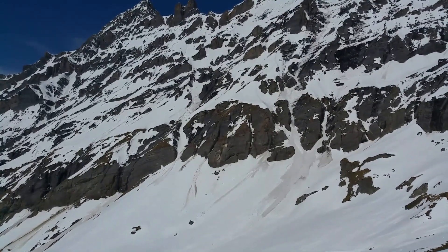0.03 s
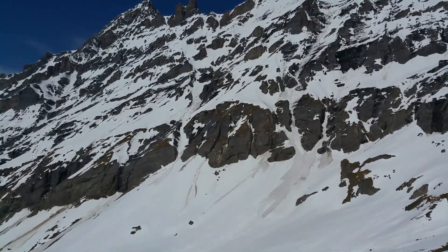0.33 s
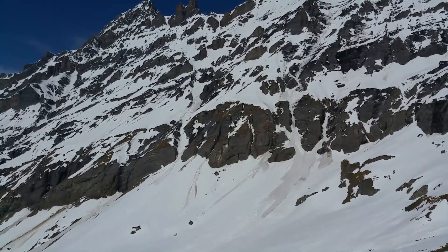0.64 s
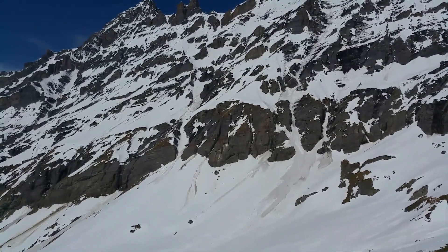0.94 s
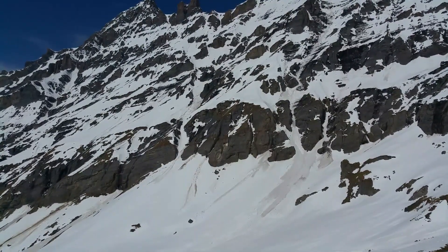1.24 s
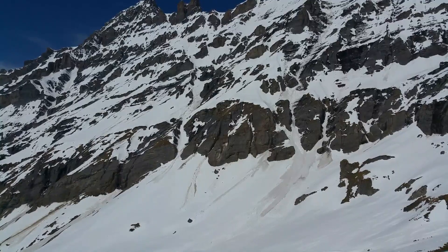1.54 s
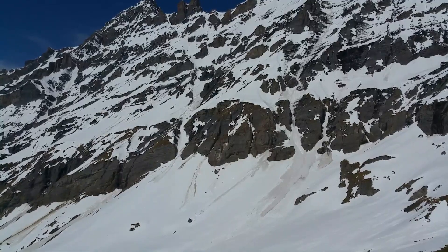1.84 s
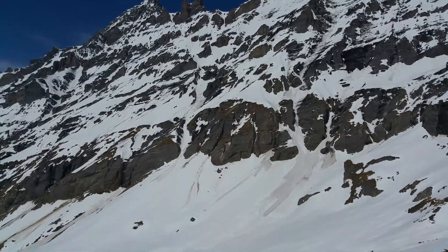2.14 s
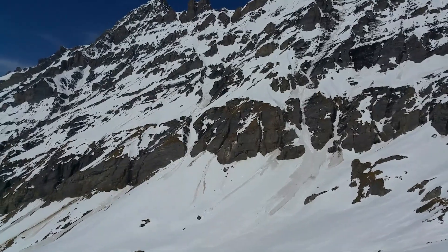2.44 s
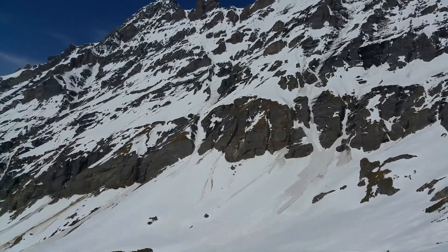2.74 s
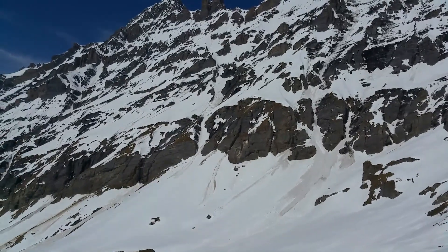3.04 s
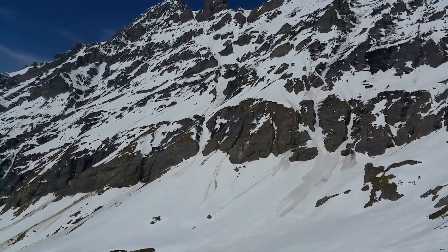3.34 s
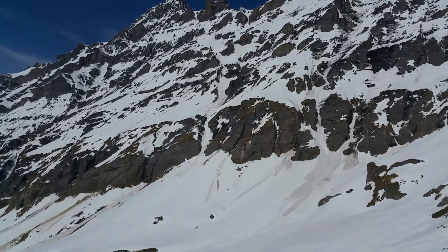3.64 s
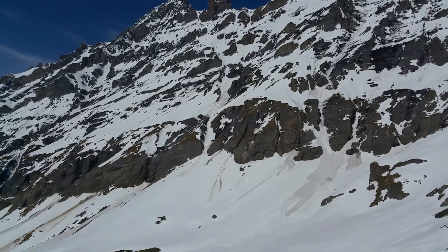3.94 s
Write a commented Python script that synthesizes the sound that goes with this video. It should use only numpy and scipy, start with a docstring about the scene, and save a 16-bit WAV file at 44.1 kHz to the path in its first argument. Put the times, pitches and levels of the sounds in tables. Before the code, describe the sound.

Steady low mountain wind rumbles, with a brief run of creaking ticks close by midway.

```python
"""A high, snowy mountainside. Wind or sliding snow makes a steady far rumble and rush, with soft thuds
and small knocks as of tumbling lumps. Early on, puffs of air buffet the left microphone port. Midway
something right at the microphone, probably its mount being turned, creaks in a run of dry stick-slip
ticks that come ever faster and then stop. The recorder adds a faint hiss and a thin on-and-off buzz."""
import sys
import numpy as np
from scipy.fft import rfft, irfft, next_fast_len
from scipy.io import wavfile
from scipy.ndimage import uniform_filter1d, map_coordinates

SR = 44100
rng = np.random.default_rng(int(sys.argv[2]) if len(sys.argv) > 2 else 0)


def waveform_to_disk(signal):
    """Save audio, clipped to [-1, 1], as 16-bit WAV at the path in sys.argv[1]."""
    frames = np.transpose(np.atleast_2d(signal))
    scaled = np.clip(frames, -1, 1) * 32767
    samples = np.round(scaled).astype(np.int16)
    wavfile.write(sys.argv[1], SR, samples)


N = 176400

# Fader ride of the midrange rush. Each row: time in seconds, level in dB.
RUSH_RIDE = [(0, -50.5), (.15, -50), (.4, -50), (.75, -50.5), (1.15, -52), (1.45, -51), (1.7, -52),
             (2.7, -51), (3.0, -53), (3.3, -53), (3.45, -50.5), (3.7, -52.5), (4, -54)]
# Slips of the creak. Each row: time in seconds, relative snap, knock and crack levels in dB,
# snap pitch in Hz.
CREAK_SLIPS = [(1.6827, -43, -43, -56, 2190), (1.714, -51, -44, -61, 2040), (1.7456, -56, -60, -62, 2080),
               (1.773, -57, -54, -58.5, 2100), (1.789, -33, -33, -52.5, 1990), (1.796, -45, -43, -63, 2260),
               (1.8344, -52, -37, -60, 2000), (1.8717, -49, -35, -63, 2000), (1.917, -54, -44, -61, 1960),
               (1.9203, -48, -56, -62, 2100), (1.9476, -47, -39.5, -63, 2160),
               (1.9733, -48, -54, -64, 2190), (2.0026, -45, -38, -69, 2130), (2.02, -53, -41, -63, 2220),
               (2.0388, -48, -49, -65, 2160), (2.0562, -46, -38, -59, 2170), (2.075, -51, -52, -60, 2290),
               (2.0885, -50, -41, -71, 2140), (2.1045, -43, -53, -68, 2110), (2.1174, -39, -38, -64, 2080),
               (2.129, -45, -43, -58, 2150), (2.1412, -48, -38, -63, 2150),
               (2.1493, -32.5, -32.5, -53, 2030), (2.1592, -44, -58, -66, 2020),
               (2.1728, -51, -38, -66, 2100), (2.184, -53, -32, -63, 2200),
               (2.197, -29.5, -26.5, -48, 2240), (2.207, -53, -37, -62, 2300),
               (2.218, -49, -34.5, -70, 2000), (2.2313, -49, -38, -64, 2200),
               (2.244, -25, -33.5, -54, 2180), (2.257, -45, -45, -67, 1980), (2.2663, -51, -38, -64, 2100),
               (2.278, -47, -36, -57, 1990), (2.2972, -29.5, -28, -45, 2260),
               (2.314, -37.5, -38.5, -50, 2170), (2.332, -45, -39, -66, 2250),
               (2.3484, -48, -48, -62, 2210), (2.353, -37, -57, -64, 1900),
               (2.3613, -29.5, -30.5, -50.5, 2090), (2.3876, -50, -37, -61, 2150),
               (2.3982, -36, -36, -58, 2080), (2.403, -49, -37, -58, 2080), (2.4219, -37, -53, -59, 2140),
               (2.4251, -34.5, -29, -54, 2200), (2.4294, -43, -44, -60, 2200),
               (2.4375, -34, -58, -59, 2260), (2.448, -48, -44, -66, 2100), (2.4747, -36, -37, -58, 2090),
               (2.4864, -35.5, -28.5, -50, 2350), (2.507, -31, -32.5, -51.5, 2190),
               (2.5333, -33.5, -35.5, -59, 1980), (2.5479, -42, -30, -51, 2260),
               (2.5522, -36.5, -39, -55, 1890), (2.5551, -35, -34, -56, 2250),
               (2.5721, -37, -43, -57, 2100), (2.576, -39, -38, -55, 2190), (2.5939, -31.5, -33, -50, 2120),
               (2.6092, -41, -36, -57, 2200), (2.6124, -38.5, -27, -49, 2300), (2.628, -43, -45, -59, 2010),
               (2.6352, -32.5, -47, -51, 1940), (2.649, -43, -51, -59, 2040),
               (2.6575, -35, -53, -51.5, 2110), (2.6742, -40, -38, -59, 2070),
               (2.6828, -28, -31.5, -46, 2030), (2.699, -48, -61, -65, 2000),
               (2.7081, -36, -36.5, -54, 2100), (2.714, -43, -49, -66, 1980), (2.7313, -50, -52, -63, 2070),
               (2.7377, -33, -50, -54, 2110), (2.7415, -43, -33, -73, 1980), (2.7484, -55, -51, -65, 2080),
               (2.7687, -27, -42, -51, 1830), (2.7769, -39, -33, -52, 2010)]


def amp(db):
    """Decibels to gain."""
    return 10 ** (np.asarray(db) / 20)


def unit(x):
    """Scale to rms 1."""
    return x / np.sqrt(np.mean(x ** 2) + 1e-20)


def along(points, hz):
    """Read (Hz, value) points on a log frequency axis."""
    f, v = np.transpose(points)
    return np.interp(np.log(hz + 1), np.log(f + 1), v)


def curve(rows):
    """Join (seconds, value) points, one value per sample."""
    return np.interp(np.arange(N) / SR, *np.transpose(rows))


def wobble(rate):
    """A smooth random curve with `rate` knots a second."""
    knots = rng.standard_normal(int(N * rate / SR) + 4)
    return map_coordinates(knots, [np.arange(N) * rate / SR])


def filtered(x, response):
    """Filter x by a complex response of frequency."""
    size = next_fast_len(N + SR // 4)
    return irfft(rfft(x, size) * response(np.fft.rfftfreq(size, 1 / SR)), size)[..., :N]


def noise(spectrum):
    """Mono coloured noise of rms 1."""
    return unit(filtered(rng.standard_normal(N), lambda hz: amp(along(spectrum, hz))))


def sides(balance_db, lag):
    """Left and right responses for a level difference and a phase lag of the left port."""
    return amp(np.outer([.5, -.5], balance_db)) * np.exp(1j * np.outer([-.5, .5], lag))


def wide_noise(spectrum, left_lag_s=.00011):
    """Stereo noise of rms 1, narrow in the bass and wide in the treble, reaching the left port later."""
    # Stereo image. Each row: frequency in Hz, then left-right coherence or left over right in dB.
    coherence = [(30, .66), (65, .9), (130, .985), (290, .985), (640, .95), (1400, .6), (3000, .15),
                 (6000, 0)]
    balance = [(50, 2.5), (200, 0), (700, 1.5), (1300, 2), (2400, -6), (4400, 0)]

    def mid_side(hz):
        width = np.arccos(np.clip(along(coherence, hz), -1, .985)) / 2
        return amp(along(spectrum, hz)) * [np.cos(width), np.sin(width)]

    mid, side = filtered(rng.standard_normal((2, N)), mid_side)
    pan = lambda hz: sides(along(balance, hz), 2 * np.pi * hz * left_lag_s)
    return unit(filtered(np.array([mid + side, mid - side]), pan))


def close_up(x):
    """Place a sound right at the microphone: level and phase differ between the two ports."""
    # Each row: frequency in Hz, then left over right in dB or the left port's lag in radians.
    balance = [(500, 0.5), (1200, 1), (2200, -2.5), (4000, -8), (8000, -3)]
    lag = [(200, 0.15), (900, 0.13), (1600, 1.2), (2500, 0.55), (3100, 2), (3800, 0.53), (5000, 1.3),
           (12000, 0.76)]
    return filtered(x, lambda hz: sides(along(balance, hz), along(lag, hz)))


def swell(t, rise_s, fall_s):
    """A rounded attack to 1 at t = 0, then an exponential decay."""
    return np.exp(-(np.minimum(t, 0) / rise_s) ** 2 - np.maximum(t, 0) / fall_s)


def bursts(rows, spectrum, rise_s, fall_s):
    """One short burst of coloured noise per (seconds, dB) row."""
    source, out = noise(spectrum), np.zeros(N)
    for s, db in rows:
        i = np.arange(max(int((s - 3 * rise_s) * SR), 0), min(int((s + 8 * fall_s) * SR), N))
        shape = swell(i / SR - s, rise_s, fall_s)
        burst = source[i] * shape
        out[i] += amp(db) * burst * np.linalg.norm(shape) / (np.linalg.norm(burst) + 1e-12)
    return out


def mountain(rumble_rough_db=0.82, rush_rough_db=1.03, shared_db=0.9, bass_db=-49.5):
    """Far wind or sliding snow: a rumble and an airy rush flutter partly together over a steady bass."""
    # Fader rides of the rumble and the rush's airy top. Each row: time in seconds, level in dB.
    rumble_ride = [(0, -42), (.3, -43), (.75, -42.5), (1.0, -44), (1.42, -40.5), (1.6, -44), (2.3, -45.5),
                   (3.1, -47.5), (3.42, -44), (3.65, -45), (3.94, -50), (4, -46)]
    air_ride = [(0, -65.5), (.14, -63.5), (.45, -66), (.8, -67.5), (1.2, -68.5), (2.8, -64), (3.2, -72.5),
                (3.52, -69), (4, -77.5)]
    # Tone of each layer, low to high. Each row: frequency in Hz, relative level in dB.
    bass_eq = [(15, -8), (30, -19), (60, -5), (95, -0.5), (150, -1), (250, -7), (600, -47), (2000, -93)]
    rumble_eq = [(15, -40), (30, -33), (60, -22), (100, -9.5), (160, 0.5), (245, 1.5), (310, -2),
                 (390, -10.5), (600, -23.5), (1500, -53.5)]
    rush_eq = [(150, -52), (310, -8.5), (430, 1), (680, -4.5), (950, -7), (1350, -11), (1680, -24),
               (2200, -26.5), (3000, -44), (5500, -62), (9000, -83)]
    air_eq = [(800, -10.5), (1500, 3.5), (2100, -0.5), (3000, -14.5), (4000, -16), (5200, -19.5),
              (6000, -35), (9000, -50)]
    shared = shared_db * wobble(22.26)
    rumble = amp(curve(rumble_ride) + shared + rumble_rough_db * wobble(40)) * wide_noise(rumble_eq)
    flutter = amp(shared + rush_rough_db * wobble(90))
    rush = amp(curve(RUSH_RIDE)) * wide_noise(rush_eq) + amp(curve(air_ride)) * wide_noise(air_eq)
    return rumble + flutter * rush + amp(bass_db) * wide_noise(bass_eq)


def hiss(level_db=-72):
    """The recorder's own steady noise floor."""
    # Each row: frequency in Hz, relative level in dB.
    hiss_eq = [(500, -26), (2500, 10.5), (4500, 3.5), (6000, -4), (8500, -2), (9900, 2), (12000, 2),
               (15500, 3)]
    return amp(level_db) * wide_noise(hiss_eq)


def thuds():
    """Soft, low thuds stand out of the rumble."""
    # Each row: time in seconds, level in dB.
    hits = [(.055, -36), (.09, -35.5), (.912, -34), (1.11, -33), (1.153, -35), (1.343, -34), (1.904, -34.5),
            (2.037, -35.5), (3.41, -34.5), (3.545, -37.5), (3.744, -36), (3.972, -35), (3.991, -43)]
    # Each row: frequency in Hz, relative level in dB.
    thud_eq = [(40, -25), (110, -6.5), (180, 3), (270, -5), (400, -16), (1200, -31), (2500, -76),
               (6000, -90)]
    return bursts(hits, thud_eq, rise_s=0.0022, fall_s=0.011)


def tumble(count=120, over_rush_db=-9):
    """Far knocks as of tumbling lumps: a few clear ones, and many small random ones that ride the rush."""
    # The clear knocks. Each row: time in seconds, level in dB.
    lumps = [(.088, -40), (.126, -32), (.66, -41), (.706, -35), (.911, -35), (.962, -33), (1.215, -42),
             (1.477, -36.5), (1.549, -52), (1.905, -34), (2.831, -37.5), (3.225, -40), (3.853, -38.5),
             (3.899, -41.5), (3.971, -47)]
    # Each row: frequency in Hz, relative level in dB.
    lump_eq = [(100, -8), (250, 4), (650, -5), (1000, -12), (1400, -15), (1750, -39), (3000, -45.5),
               (6000, -65)]
    when, size = rng.random((count, 2)).T
    times = when * N / SR
    size_db = -6 * np.log(0.16 + size)  # mostly small, now and then larger
    levels = np.interp(times, *np.transpose(RUSH_RIDE)) + over_rush_db + size_db
    return bursts([*lumps, *zip(times, levels)], lump_eq, rise_s=0.00043, fall_s=0.0017)


def buzz(pulse_hz=216.7):
    """A thin buzz of tiny, probably electrical, pulses comes and goes in the hiss."""
    # Each row: start in seconds, end in seconds, level in dB.
    bouts = [(0.187, .215, -80), (.347, .371, -77.5), (.385, .413, -79), (.509, 0.53, -76.5),
             (.552, 0.572, -78), (1.237, 1.283, -78), (1.286, 1.311, -78), (1.319, 1.34, -79),
             (1.5, 1.521, -81)]
    # Each row: frequency in Hz, relative level in dB.
    buzz_eq = [(4000, -32), (6200, -13), (7000, -16), (7900, -10), (8800, -15), (9600, 0), (10100, 0),
               (10700, -13), (11500, -8), (14000, -20)]
    t = np.arange(N) / SR
    partials = pulse_hz * np.arange(20, 65)
    pulses = sum(amp(along(buzz_eq, hz)) * np.cos(2 * np.pi * hz * t) for hz in partials)
    gate = sum(amp(db) * ((t > start) & (t < end)) for start, end, db in bouts)
    return uniform_filter1d(gate, size=200) * unit(pulses)


def tick():
    """One faint, bright tick at the microphone."""
    # The row: time in seconds, level in dB.
    hit = [(.3225, -69.5)]
    # Each row: frequency in Hz, relative level in dB.
    tick_eq = [(2500, -25), (4200, -2), (5500, 0), (6500, -12), (10000, -30)]
    return close_up(bursts(hit, tick_eq, rise_s=0.00073, fall_s=0.002))


def buffet(right_db=-10):
    """Brief puffs of air push mostly on the left port."""
    # Each row: peak time in seconds, half-length in seconds, level in dB.
    puffs = [(.373, 0.0072, -25), (0.437, 0.026, -38.5), (0.577, 0.028, -47)]
    # Each row: frequency in Hz, relative level in dB.
    puff_eq = [(10, -16), (30, -9), (85, 9), (140, 2), (250, -24), (800, -60), (3000, -100)]
    t = np.arange(N) / SR
    push = sum(amp(db) * np.exp(-((t - s) / width) ** 2) for s, width, db in puffs)
    return push * np.array([noise(puff_eq), amp(right_db) * noise(puff_eq)])


def rubbing(grain_db=4.0, grain_cap_db=6, width_db=-7):
    """Fine, grainy friction between the slips."""
    # Each row: time in seconds, level in dB.
    rub_ride = [(1.64, -100), (1.69, -61.5), (1.8, -66), (1.88, -66), (2.05, -57.5), (2.18, -54.5),
                (2.45, -53.5), (2.7, -53.5), (2.78, -51.5), (2.84, -100)]
    # Each row: frequency in Hz, relative level in dB.
    scrape_eq = [(200, -35), (600, 6), (1300, -8.5), (1650, -8), (2300, -10), (3100, -16), (4200, -25),
                 (5300, -24.5), (5800, -32), (15000, -36.5)]
    scrape = noise(scrape_eq) + amp(width_db) * np.array([noise(scrape_eq), noise(scrape_eq)])
    grain = amp(np.minimum(grain_db * wobble(350), grain_cap_db))
    return amp(curve(rub_ride)) * unit(grain * scrape)


def snaps(trim_db=-0.5, chatter_db=-13.5, chatter_s=0.0032):
    """Each slip rings a heavily damped mode for a few cycles; two weak after-slips follow."""
    out = np.zeros(N)
    for s, db, _, _, hz in CREAK_SLIPS:
        jitter, phases = rng.random((2, 3))
        delays = chatter_s * np.arange(3) * (.5 + jitter / 2)
        i = int(s * SR) + np.arange(-SR // 200, SR // 40)
        for k, (delay, phase) in enumerate(zip(delays, phases)):
            t = i / SR - s - delay
            gain = amp(db + trim_db + chatter_db * np.sqrt(k))
            out[i] += gain * swell(t, rise_s=0.0007, fall_s=0.00054) * np.sin(2 * np.pi * (hz * t + phase))
    return out


def slip_noise(knock_lag_s=0.00037, crack_width_db=-2):
    """Each slip gives a dull knock, a thin crack and a sharp edge that grows with its snap."""
    # Tone of the three transients. Each row: frequency in Hz, relative level in dB.
    knock_eq = [(120, -27), (350, -6.5), (650, 7.5), (1000, 0), (1350, -1), (1700, -19), (2600, -19),
                (5000, -70)]
    crack_eq = [(1500, -16), (2400, -2.5), (2850, 5.5), (3300, -1.5), (3800, -5.5), (4500, -8.5),
                (5250, -14), (5600, -22), (6500, -23.5), (8500, -37), (16000, -38)]
    edge_eq = [(3000, -23), (5000, 4), (7000, -1), (9000, -5), (12000, 4), (16000, -9)]
    times, snap_db, knock_db, crack_db, _ = np.transpose(CREAK_SLIPS)
    knocks = bursts(zip(times + knock_lag_s, knock_db - 2), knock_eq, rise_s=0.00059, fall_s=0.0012)
    crack = lambda: bursts(zip(times, crack_db + 0.5), crack_eq, rise_s=0.00073, fall_s=0.002)
    cracks = crack() + amp(crack_width_db) * np.array([crack(), crack()])
    edge_db = -62 + 0.9 * (snap_db + 29)  # a full snap stands at -29 dB
    edge = lambda: bursts(zip(times, edge_db), edge_eq, rise_s=0.00078, fall_s=0.0013)
    return knocks + cracks + np.array([edge(), edge()])


def ringing(binds_at_s=1.8):
    """Until the joint binds, every slip leaves the part ringing briefly in its modes."""
    # Each row: frequency in Hz, level relative to the crack in dB, seconds to fall by 60 dB.
    modes = [(1820, -4, .05), (2255, -1, .06), (2856, -9, .07), (3770, -6, .08), (5240, -12, .07),
             (6450, -23, .05)]
    t, out = np.arange(SR // 5) / SR, np.zeros(N)
    free_slips = [(s, crack_db) for s, _, _, crack_db, _ in CREAK_SLIPS if s < binds_at_s]
    for s, crack_db in free_slips:
        for hz, mode_db, t60 in modes:
            size, detune = rng.standard_normal(2)
            decay = amp(crack_db + mode_db + 2 * size - 60 * t / t60)
            out[int(s * SR):][:len(t)] += decay * np.sin(2 * np.pi * hz * (1 + .008 * detune) * t)
    return out


def creak():
    """Stick-slip at the microphone: the joint rubs, catches and lets go in a quickening run of ticks."""
    return close_up(rubbing() + snaps() + slip_noise() + ringing())


def scene():
    """The far mountain bed, the recorder's hiss and buzz, and the close sounds at the microphone."""
    return mountain() + hiss() + thuds() + tumble() + buzz() + tick() + buffet() + creak()


def record(dry, top_hz=15800):
    """The recorder keeps nothing above its band limit."""
    return filtered(dry, lambda hz: hz < top_hz)


dry = scene()
out = record(dry)
waveform_to_disk(out)
```